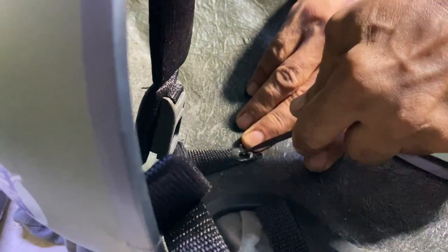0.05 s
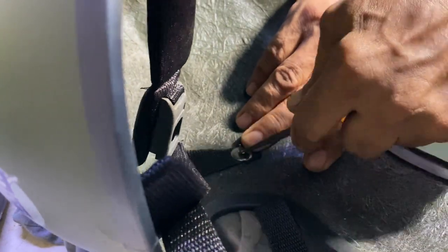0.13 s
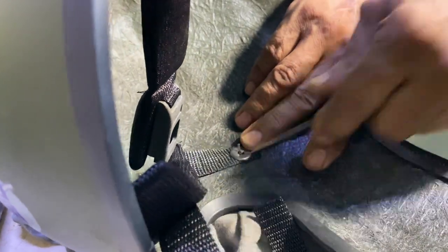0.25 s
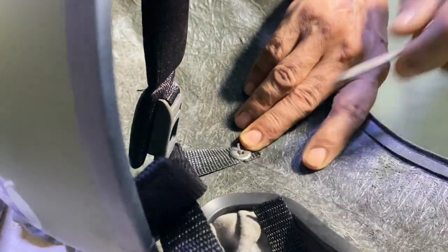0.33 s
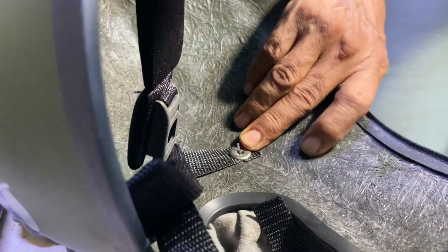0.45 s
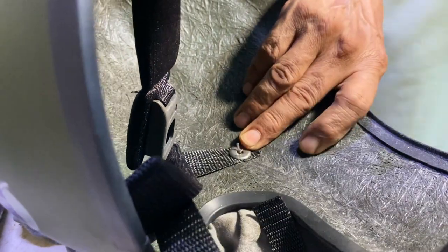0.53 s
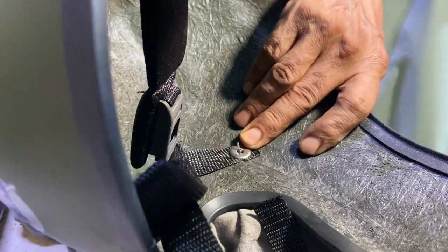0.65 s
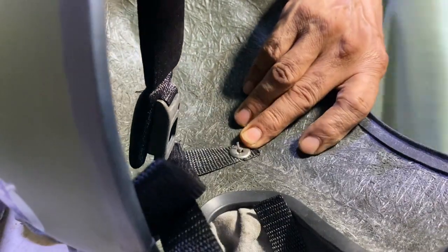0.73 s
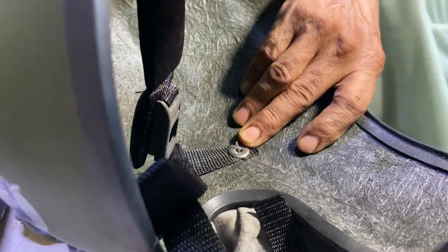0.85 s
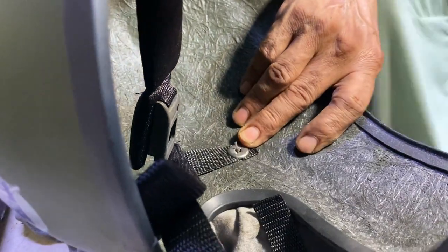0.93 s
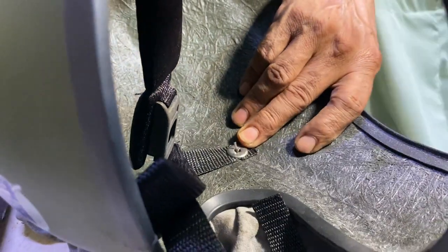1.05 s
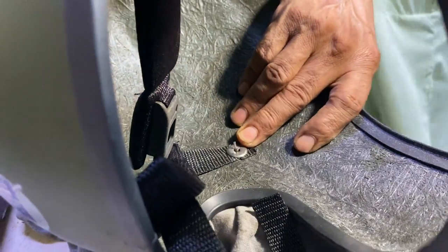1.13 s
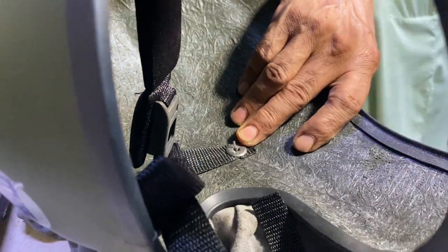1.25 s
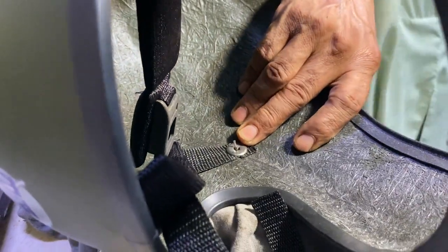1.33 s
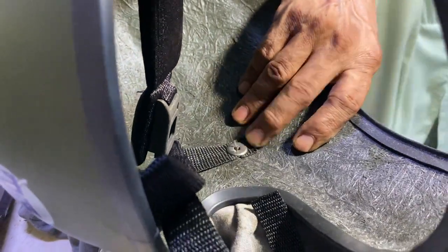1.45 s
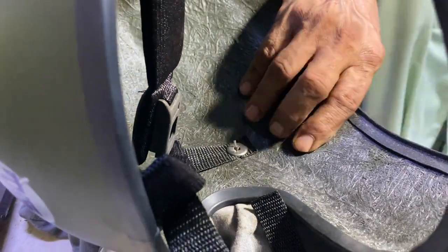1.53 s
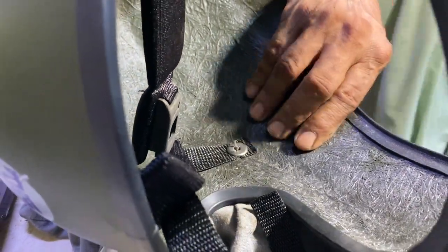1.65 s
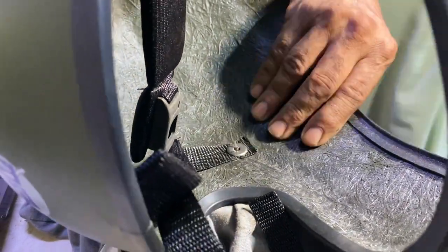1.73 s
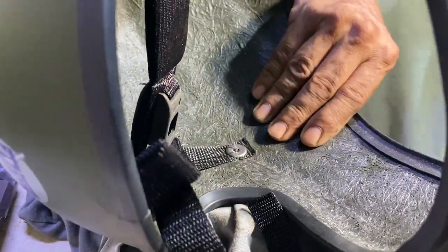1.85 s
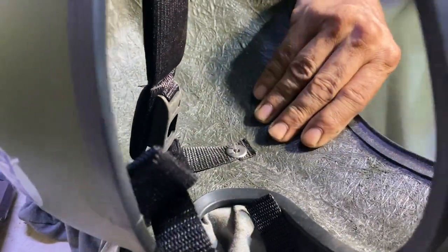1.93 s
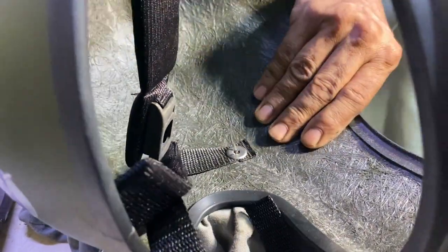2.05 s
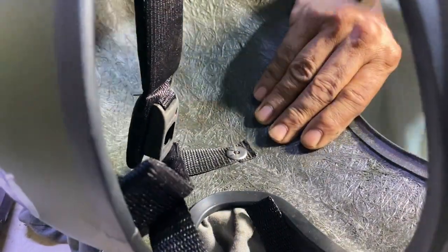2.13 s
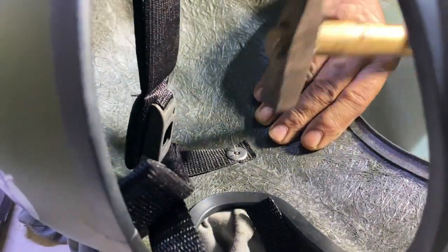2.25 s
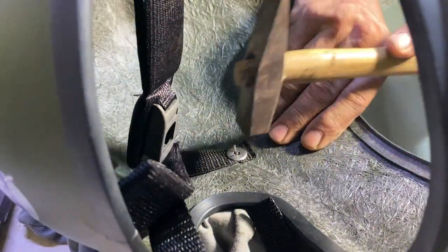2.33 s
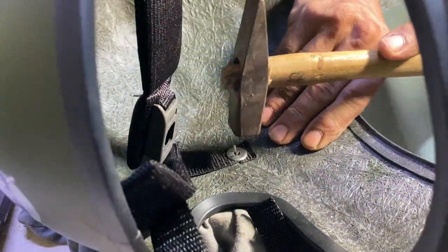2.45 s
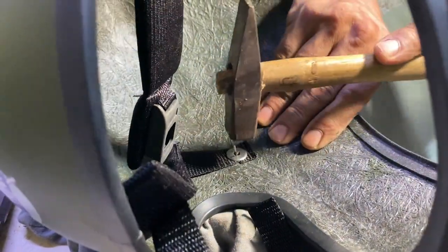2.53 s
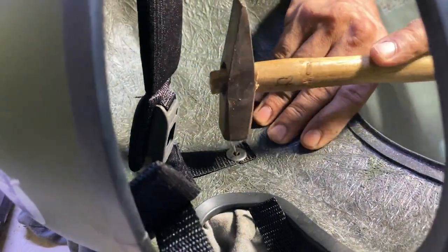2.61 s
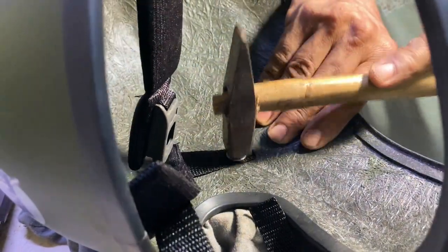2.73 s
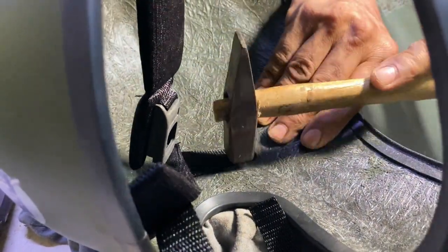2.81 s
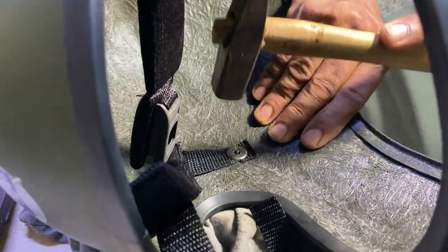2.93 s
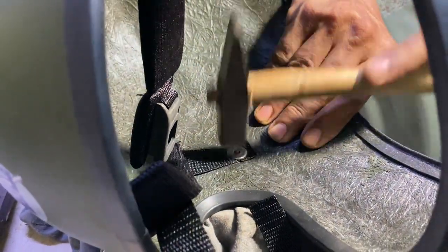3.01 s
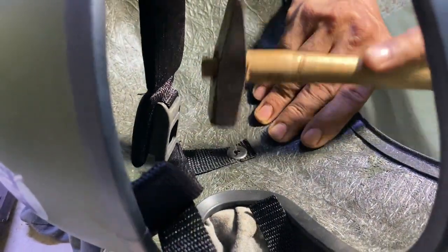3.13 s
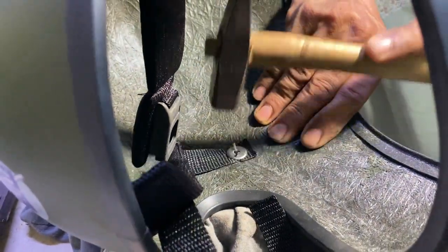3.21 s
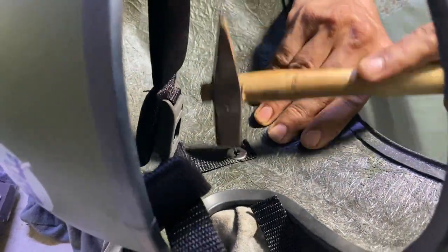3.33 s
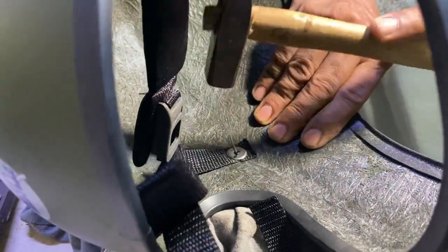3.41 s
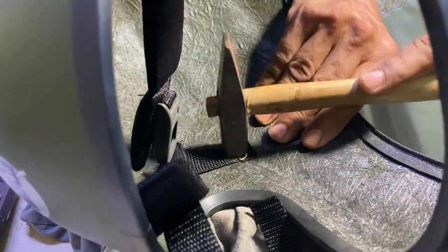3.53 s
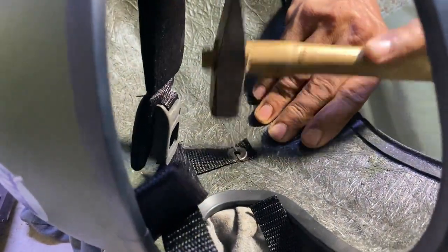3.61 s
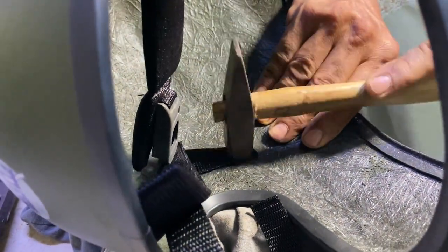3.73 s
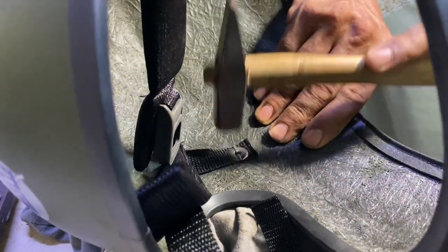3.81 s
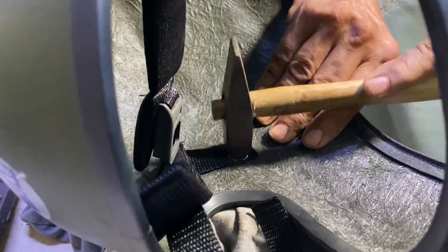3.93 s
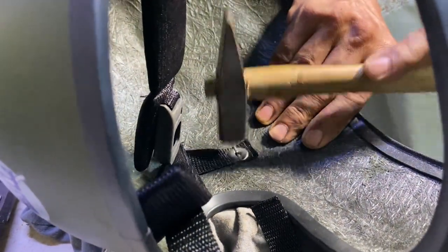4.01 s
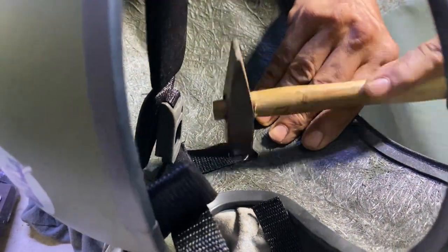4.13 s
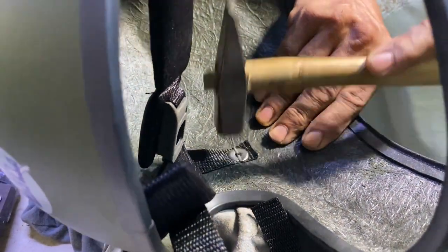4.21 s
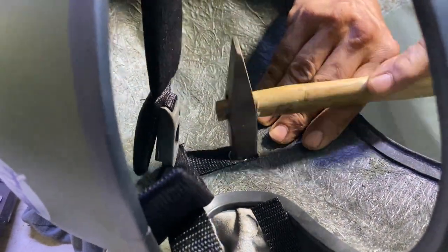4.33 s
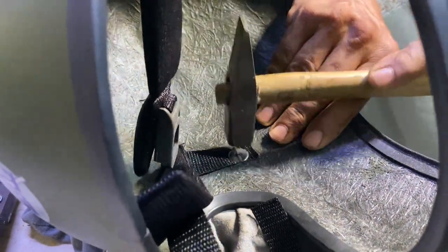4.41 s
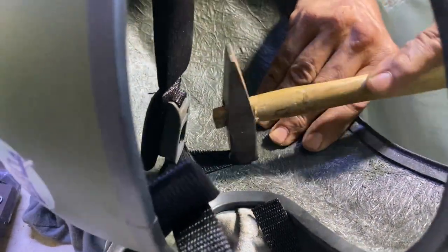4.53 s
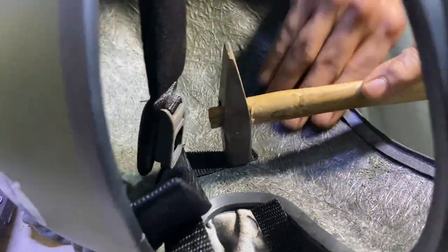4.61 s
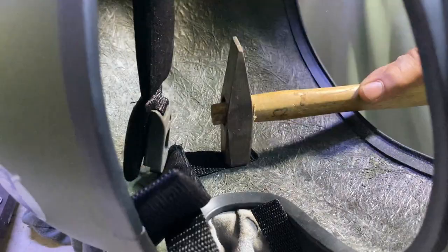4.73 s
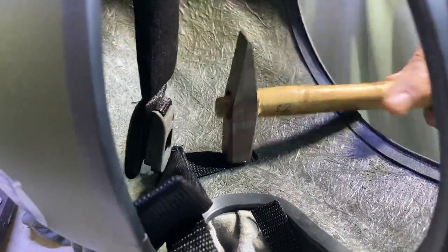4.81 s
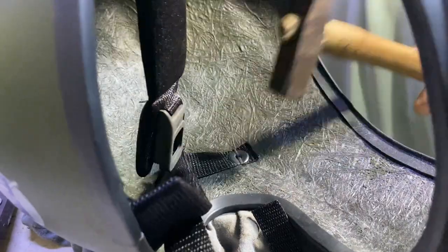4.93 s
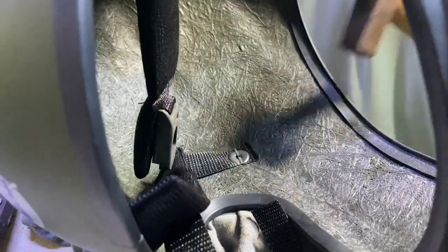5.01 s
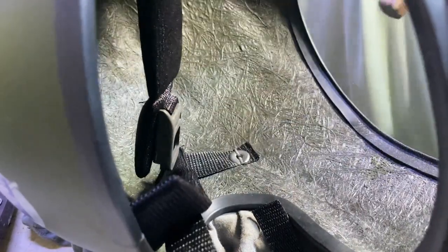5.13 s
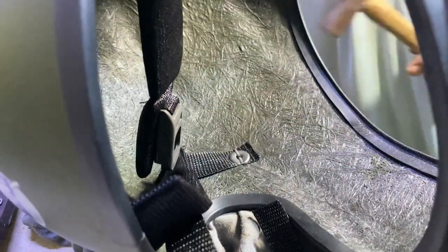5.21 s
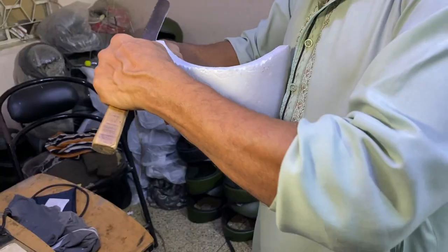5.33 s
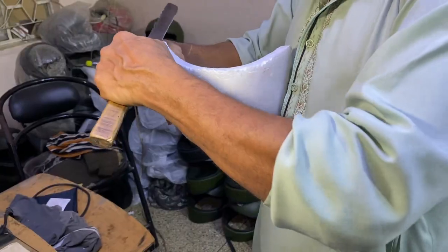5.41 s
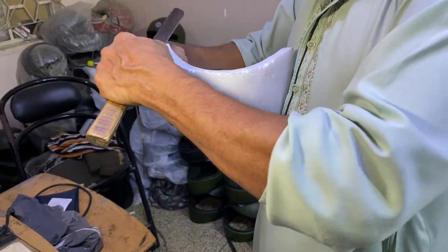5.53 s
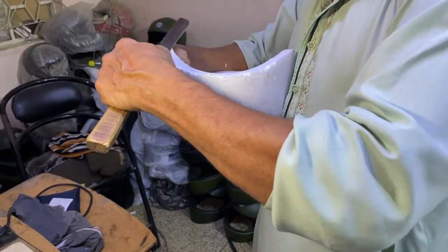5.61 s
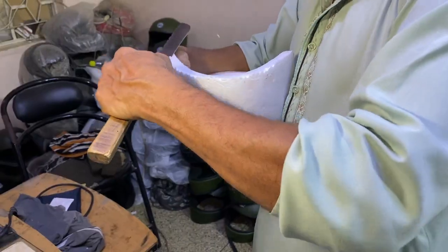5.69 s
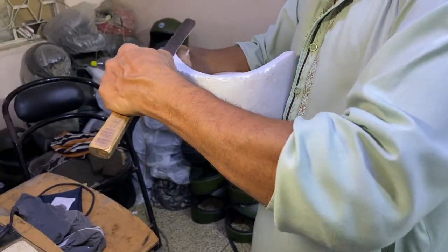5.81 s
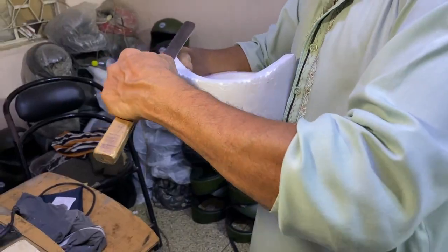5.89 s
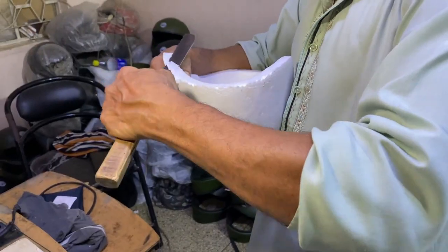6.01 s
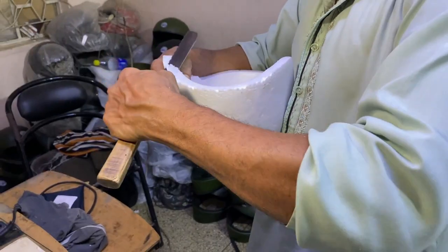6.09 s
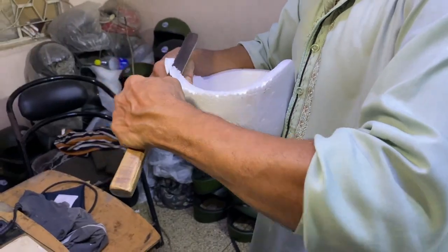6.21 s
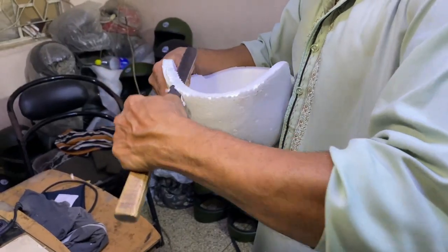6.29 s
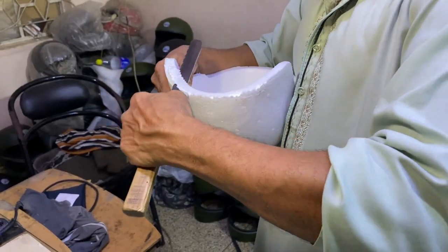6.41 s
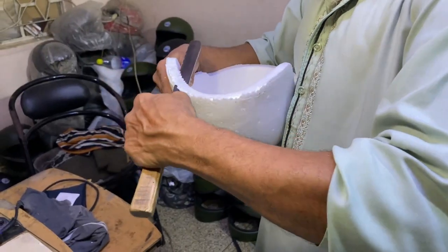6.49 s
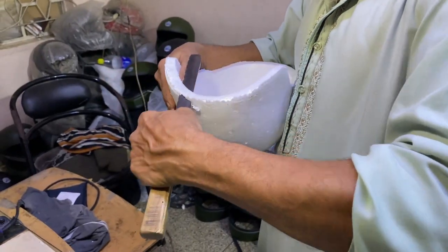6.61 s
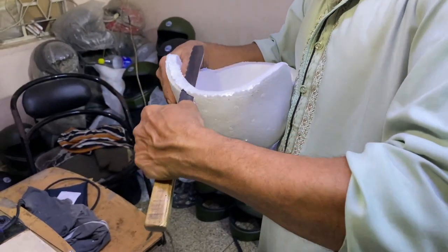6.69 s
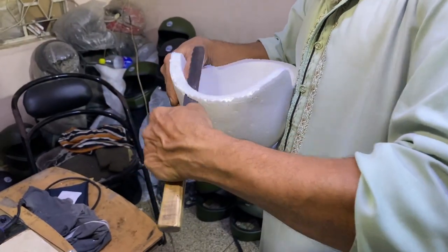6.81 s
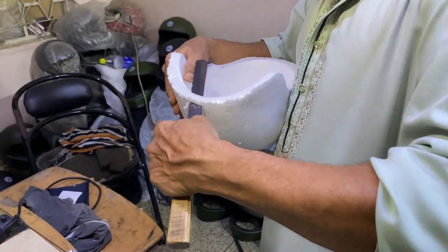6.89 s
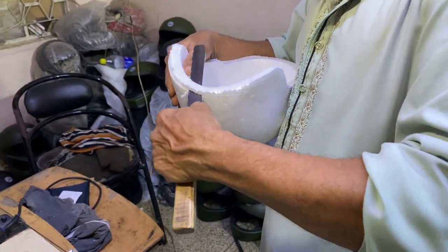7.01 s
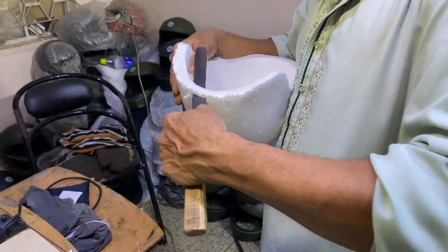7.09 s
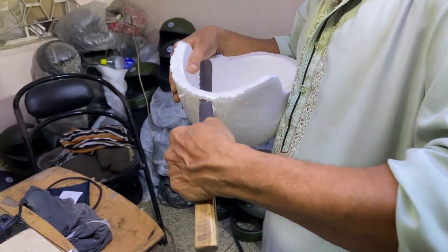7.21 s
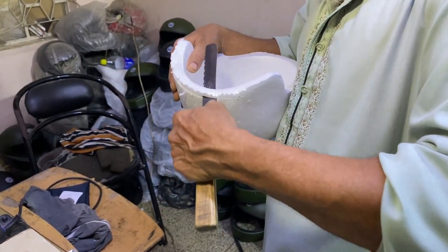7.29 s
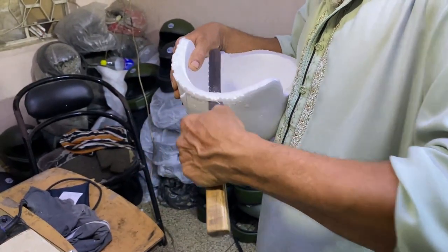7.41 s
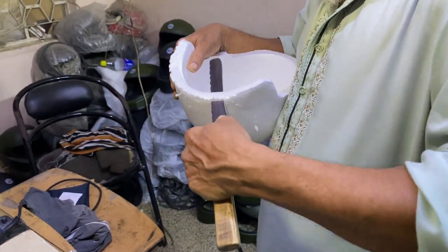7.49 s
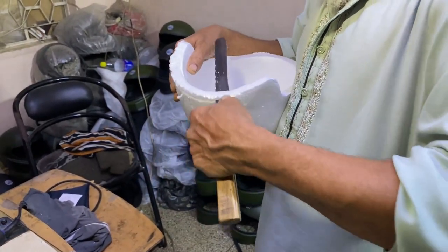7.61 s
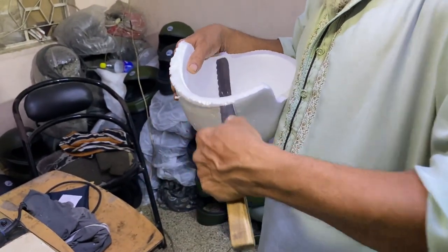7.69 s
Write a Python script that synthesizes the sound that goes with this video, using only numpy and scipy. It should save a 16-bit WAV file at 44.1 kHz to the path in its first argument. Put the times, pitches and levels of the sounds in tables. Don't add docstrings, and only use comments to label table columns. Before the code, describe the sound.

A tool clatters onto a bench, a hammer knocks a rivet into a hollow helmet shell, then a rasp scrapes foam in quick strokes amid wind thumps.

```python
import sys
import numpy as np
from scipy import signal
from scipy.fft import rfft, irfft
from scipy.io import wavfile

SR = 44100
rng = np.random.default_rng(int(sys.argv[2]) if len(sys.argv) > 2 else 0)


def dump(signal):
    limited = np.clip(np.atleast_2d(signal).T, -1, 1)
    pcm = np.round(limited * 32767).astype(np.int16)
    wavfile.write(sys.argv[1], SR, pcm)


def to_linear_factor(level_db):
    exponent = np.asarray(level_db, float) / 20
    return 10 ** exponent


N = 341775

# (pitch [Hz], left over right [dB])
LEFT_LIFT = [(100, 0.5), (500, 3), (1200, 12.5), (2200, 2.5), (4000, 20), (7000, 40)]

EDGES = 45 * 2 ** np.arange(0, 8.6, .5)
BANK = [signal.butter(2, [lo, hi], "band", fs=SR, output="sos") for lo, hi in zip(EDGES, EDGES[1:])]
CENTRES = np.sqrt(EDGES[:-1] * EDGES[1:])


def rms_one(x):
    return x / np.sqrt(np.mean(x ** 2) + 1e-20)


def in_time(rows):
    s, *columns = np.transpose(rows)
    return [np.interp(np.arange(N) / SR, s, c) for c in columns]


def at_hz(points, hz):
    pitch, value = np.array(points)[:, 0], np.array(points)[:, 1]
    return np.interp(np.log(hz), np.log(pitch), value)


def drift(rate, size):
    r = np.exp(-80 * np.pi * rate / SR)
    chance = rng.standard_normal(size // 40 + 1002)
    slow = signal.lfilter([1], [1, -2 * r, r * r], chance)[1000:]
    return np.interp(np.arange(size) / 40, np.arange(len(slow)), rms_one(slow))


def add(out, sound, s):
    i = round(s * SR)
    out[:, i:i + sound.shape[-1]] += sound[..., :N - i]


def coloured(x, spectrum):
    hz = np.maximum(np.fft.rfftfreq(x.shape[-1], 1 / SR), 1)
    return irfft(rfft(x) * to_linear_factor(at_hz(spectrum, hz)), x.shape[-1])


def bands(spectrum, white, shape):
    # (pitch [Hz], likeness [0 to 1])
    likeness = [(60, 0.92), (250, 1), (600, 0.3), (1200, 0.49), (1900, 0.2), (2500, 0.62), (4000, 0.52),
                (6500, 0.13)]
    out = 0
    for k, (sos, hz) in enumerate(zip(BANK, CENTRES)):
        mid, side = signal.sosfilt(sos, white[k % 2])
        alike = np.clip(at_hz(likeness, hz), -1, 1)
        stereo = np.sqrt(1 + alike) * mid + np.sqrt(1 - alike) * side * [[1], [-1]]
        out = out + to_linear_factor(at_hz(spectrum, hz)) * shape(hz) * stereo
    return out


def burst(spectrum, t60, size):
    t = np.arange(size) / SR
    white = rng.standard_normal((2, 2, size))
    noise = bands(spectrum, white, lambda hz: to_linear_factor(-60 * t / np.maximum(t60(hz), 1e-3)))
    return noise / np.sqrt(np.mean(noise[:, :150] ** 2))


def struck(modes, gains_db, travel, size):
    hz, level_db, t60 = np.transpose(modes)
    t = np.maximum(np.arange(size) / SR - (travel / np.sqrt(hz))[:, None], 0)
    luck = rng.standard_normal((4, len(hz)))
    pitch = hz * (1 + .03 * luck[3])
    rings = np.sin(2 * np.pi * pitch[:, None] * t) * to_linear_factor(-60 * t / t60[:, None])
    spot_db = 1.5 * luck[:3]
    side_db = at_hz(LEFT_LIFT, hz) / 2 * [[1], [-1]] + spot_db[1:]
    signs = (-1) ** np.arange(len(hz))
    return (to_linear_factor(level_db + gains_db + spot_db[0] + side_db) * signs) @ rings


def room_tone():
    # (pitch [Hz], level [dB per Hz])
    hum = [(35, -34), (60, 2.5), (92, -9.5), (284, -3.5), (328, 0.5), (437, -9), (484, -2.5), (645, -8.5),
           (971, -1), (1430, -10.5), (1720, -9.5), (2490, -15.5), (2930, -21), (8000, -40.5), (10400, -62),
           (17600, -120)]
    # (pitch [Hz], level [dB per Hz])
    hiss = [(1500, -19), (4000, -1.5), (7000, -4.5), (11000, -9), (16500, -11)]
    # (hum [dB], hiss [dB])
    places = [
        (-37, -67.5),
        (-36, -61),
    ]
    # (time [s], level change [dB])
    shade = [
        (0, 0.5),
        (3.4, 1.26),
        (3.8, -1.5),
        (4.4, -1.5),
        (4.65, -5),
        (4.95, -6.5),
        (5.32, -2.5),
    ]
    move_s = 5.325
    shade_db, = in_time(shade)
    moved = np.arange(N) >= move_s * SR
    hum_db = np.where(moved, places[1][0], places[0][0] + shade_db)
    hiss_db = np.where(moved, places[1][1], places[0][1] + 1.26 * shade_db)
    together = drift(9.3, N)
    white = rng.standard_normal((2, 2, N))
    flat = bands([(20, 0), (20000, 0)], white, lambda hz: to_linear_factor(.8 * together + 1.2 * drift(10, N)))
    low = to_linear_factor(hum_db + 1.5) * rms_one(coloured(flat, hum))
    high = to_linear_factor(hiss_db + 6.0) * rms_one(coloured(flat, hiss))
    return (low + high) * to_linear_factor([[.6], [-.6]])


def draught():
    # (time [s], level [dB], brightness [dB])
    flow = [(0.0, -34.5, -3), (0.3, -38.5, 4), (0.47, -33, -4), (1.64, -47.5, 3.5), (2.22, -33.5, -5.5),
            (2.59, -42, 8), (3.17, -28.5, -4), (3.39, -41.5, 6.5), (4.1, -45.5, 6.5), (4.64, -33.5, -3),
            (4.92, -27.5, -11), (5.18, -25.5, -11.5), (5.33, -32, -0.5), (5.83, -31.5, 0.5),
            (6.06, -39, -7), (6.86, -32, -2.5), (7.38, -35.5, 5), (7.75, -29.5, -8)]
    # (time [s], peak [dB], pitch [Hz])
    gusts = [(0.436, -14.5, 174), (0.488, -21, 362), (0.525, -13.5, 149), (0.601, -18.5, 86.1),
             (1.677, -28.5, 76), (2.004, -14.5, 210), (2.123, -24, 81), (2.678, -29.5, 68.6),
             (3.22, -24, 150), (0.299, -19.5, 91), (0.779, -23, 90), (4.81, -22, 103.5),
             (5.037, -18.5, 113), (5.297, -19.5, 61.5), (5.671, -30.5, 83.4), (5.88, -21, 207),
             (5.925, -9.5, 122.5), (6.227, -14.5, 150), (6.319, -18, 112), (6.651, -17.5, 205),
             (6.678, -18, 240), (6.828, -15, 147), (6.899, -17.5, 194), (6.998, -19.5, 126),
             (7.111, -11.5, 70.0), (7.127, -19, 83), (7.209, -22, 83.4), (7.28, -16, 147),
             (7.466, -17, 192)]
    # (multiple of its pitch [times], level [dB per Hz])
    puff = [(.5, 3.5), (1.2, -1.5), (2.6, -8.5), (4.5, -26.5), (12.5, -66)]
    swell_db, swell_rise_s, swell_s = -14.5, 0.0055, 0.029
    level_db, bright_db = in_time(flow)

    clock = np.arange(0, N, 40) / SR
    swells = 0
    for s, db, hz in gusts:
        rise_and_fall = np.minimum((clock - s) / swell_rise_s, (s - clock) / swell_s)
        swells = swells + to_linear_factor(db + swell_db) * np.exp(rise_and_fall)
    lumps_db = 5 * np.tanh(drift(5.8, N))
    level_db = 20 * np.log10(to_linear_factor(level_db + lumps_db) + np.repeat(swells, 40)[:N])

    common, own = rng.standard_normal((2, N)), rng.standard_normal((2, 2, N))
    low_band = signal.butter(2, [50, 150], "band", fs=SR, output="sos")
    high_band = signal.butter(2, [150, 400], "band", fs=SR, output="sos")
    low = signal.sosfilt(low_band, common[0] + 0.27 * own[0])
    high = signal.sosfilt(high_band, common[1] + 0.53 * own[1])
    high_gain = to_linear_factor(bright_db - 3 + 2.7 * np.tanh(drift(36, N)))
    flutter_db = 4.46 * np.tanh(drift(25, N))
    out = to_linear_factor(level_db - 3.0 + flutter_db) * (rms_one(low) + high_gain * rms_one(high))

    t = np.arange(4000) / SR
    for s, db, hz in gusts:
        push = burst(np.multiply(puff, [hz, 1]), lambda hz: 0.075, size=3000)
        add(out, to_linear_factor(db - 14) * push, s + .006)
        cycles = hz * (t + 0.54 * 0.012 * (1 - np.exp(-t / 0.0081)))
        thump = np.sin(2 * np.pi * cycles) + 0.37 * np.sin(4.6 * np.pi * cycles) * np.exp(-t / 0.0055)
        fade = (1 - np.exp(-t / 0.0045)) * np.exp(-t / 0.016)
        add(out, to_linear_factor(db - 5.0) * thump * fade, s + 0.00794)
    return out


def clatter():
    # (time [s], peak [dB], hollow knock against it [dB], rattle's 60 dB fade [s])
    hits = [
        (1.1217, -11, -1, 0.078),
        (1.1411, -11.5, 4, 0.12),
        (1.1541, -16, -11, 0.025),
        (1.1591, -9, -15, 0.06),
        (1.1687, -3, -34, 0.023),
        (1.1767, -12.5, -7, 0.11),
        (1.2076, -24, -20, 0.072),
        (1.237, -20.5, -9.5, 0.2),
    ]
    # (pitch [Hz], level [dB], 60 dB fade [s])
    bench = [(252, -11, 0.12), (563, -5, 0.073), (693, 2.5, 0.04), (892, -1.5, 0.038), (1113, -9.5, 0.047),
             (1467, -11.5, 0.046), (2023, 1, .04), (2420, -30, .03)]
    # (pitch [Hz], level [dB per Hz])
    rattle = [(300, -32), (700, -9), (2000, 3), (4000, -2), (8000, -7), (12000, -20), (16500, -3)]
    # (time [s], peak [dB], 60 dB fade [s], body against it [dB])
    ticks = [
        (0.2977, -25, 0.036, 5),
        (0.305, -24, 0.029, 8),
        (4.6643, -41, 0.03, -2),
        (4.6787, -40, 0.028, 6),
        (5.3338, -35, 0.034, -9),
        (5.499, -38, 0.026, -10),
        (5.5774, -47, 0.03, 4),
        (6.316, -18, 0.048, -22),
    ]
    out = np.zeros((2, N))
    for s, db, knock_db, t60 in hits:
        knock = struck(bench, knock_db - 3, travel=0.017, size=5000)
        bright = to_linear_factor(-7.0) * burst(rattle, lambda hz: t60, size=5000)
        add(out, to_linear_factor(db) * (knock + bright), s)
    for s, db, t60, body_db in ticks:
        colour = [(600, body_db + 7), (3000, body_db), (7000, -3), (16500, -7.5)]
        add(out, to_linear_factor(db - 8.0) * burst(colour, lambda hz: t60, size=3000), s)
    return out


def rasp():
    # (start [s], level [dB], part spent speeding up [0 to 1])
    strokes = [(5.575, -45, 0.6), (5.80, -48, 0.13), (5.961, -38.5, 0.46), (6.11, -39.5, 0.32),
               (6.25, -36, 0.53), (6.404, -36, 0.35), (6.545, -38.5, 0.42), (6.714, -35, 0.35),
               (6.842, -35, 0.38), (7.029, -38, 0.17), (7.15, -35, 0.5), (7.288, -34.5, 0.55),
               (7.428, -34.5, 0.5), (7.574, -33, 0.41), (7.682, -36, 0.25)]
    # (pitch [Hz], level [dB per Hz])
    foam = [(500, 4), (1200, 2.5), (2500, -1), (5000, -3.5), (8000, 2.5), (12000, -10.5), (16500, 12)]
    # (pitch [Hz], width [Hz], level [dB])
    liner = [(1300, 200, 0), (2000, 200, -2), (2500, 220, 0), (3200, 250, -1), (4100, 300, -1),
             (4800, 300, -2), (5600, 350, -2)]
    last_turn_s = 7.81
    bite, speed_power = 0.91, 2.1
    turn_db = -13
    body_gain_db, body_follows, body_lag_s = 1.5, .85, .01

    start = round(strokes[0][0] * SR)
    size = N - start
    t = (start + np.arange(size)) / SR
    turns, peak_db, rise = np.transpose(strokes)
    ends = np.append(turns[1:], last_turn_s)
    fastest = turns + np.clip(rise, .1, .9) * (ends - turns)
    moments = np.append(np.ravel([turns, fastest], order="F"), ends[-1])
    swing = np.interp(t, moments, np.arange(2 * len(turns) + 1) / 2)
    speed = np.abs(np.sin(np.pi * swing)) ** speed_power
    speed_db = 20 * np.log10(np.tanh(bite * speed) / np.tanh(bite) + to_linear_factor(turn_db))
    level_db = np.interp(t, fastest, peak_db) + speed_db
    late_db = np.interp(t - body_lag_s, t, speed_db)
    body_db = body_gain_db + body_follows * late_db - speed_db

    uneven_db = 1.48 * rng.exponential(1, size) + 2.0 * drift(270, size)
    grains = rng.standard_normal((2, 2, size)) * to_linear_factor(uneven_db)

    def band_gain(hz):
        body = np.clip(np.log2(9000 / hz), 0, 1)
        return to_linear_factor(body * (body_db - 1) + (1.2 + 1.3 * body) * drift(12, size))

    tearing = bands(foam, rms_one(grains), band_gain)
    for hz, width_hz, db in liner:
        r = np.exp(-np.pi * width_hz / SR)
        feedback = [1, -2 * r * np.cos(2 * np.pi * hz / SR), r * r]
        ringing = signal.lfilter([1, 0, -1], feedback, grains[0, 0] + grains[1])
        grip_db = 9.7 * np.tanh(drift(6.9, size))
        tearing += to_linear_factor(db + body_db - 20.0 + grip_db) * rms_one(ringing)
    out = np.zeros((2, N))
    out[:, start:] = to_linear_factor(level_db + 6.5) * tearing * np.minimum(np.arange(size) / 2000, 1)
    return out


def sweep(colour, travel, size):
    # (pitch [Hz], level [dB per Hz])
    pulse = [(30, -14.5), (110, 14), (250, 2), (450, -1.5), (800, 18.5), (1300, -2), (2200, -9.5),
             (4500, -16), (7000, -40.5)]
    hz = np.maximum(np.fft.rfftfreq(size, 1 / SR), 1)
    side_db = at_hz(LEFT_LIFT, hz) / 2 * [[1], [-1]]
    gain = to_linear_factor(at_hz(pulse, hz) + at_hz(colour, hz) + side_db)
    turn = np.exp(-4j * np.pi * travel * np.sqrt(hz) - 1j * rng.uniform(-.6, .6))
    return SR / 2600 * irfft(gain * turn, size)


def hammer():
    # (time [s], knock peak [dB], then against it: boom [dB], shell body [dB], steel crack [dB])
    blows = [(2.805, -17, -13, 1.5, -7), (2.8369, -25.5, -16, 0, -19), (3.087, -12, -24.5, -4, -3),
             (3.3122, -17, -34, -6, -13), (3.3165, -15, -23, 6.5, -2), (3.3278, -24.5, -12, -15, -5),
             (3.5471, -11, -11, 2, -7.5), (3.7659, -17, -13, 10, -9.5), (3.7929, -39, -6.5, 15, -5),
             (3.9734, -11.5, -19.5, 1.5, -9.5), (4.1695, -9, -19.5, -2, -9), (4.352, -12.5, -22, 4, -25.5),
             (4.3738, -18, -24.5, 2.5, -13), (4.5045, -15.5, -28, 5, -17.5), (4.518, -29, -7, 5.5, -22.5)]
    # (pitch [Hz], level [dB], 60 dB fade [s])
    shell = [(48.7, 1.5, 0.11), (76, -1, 0.23), (108, 10.5, 0.081), (165.4, 9.5, 0.075), (210, 7, 0.21),
             (319, 11.5, 0.055), (366.5, 6, 0.14), (622, 9.5, 0.035), (700, 17.5, 0.015), (946, 6.5, 0.077),
             (1154, -3.5, 0.098), (1533, 9.5, 0.035), (1980, 4.5, 0.029), (2396, 6, 0.018),
             (2830, -28, 0.0138), (3460, -1.5, 0.029)]
    # (pitch [Hz], level [dB], 60 dB fade [s])
    steel = [(5500, -27, 0.015), (7000, 10, 0.0018), (8250, 0, 0.006), (9900, -7, 0.017),
             (12170, 4.5, 0.0031), (14700, -13.5, 0.0103)]
    # (pitch [Hz], level [dB per Hz])
    crack = [(800, 24.5), (3000, -17), (8000, 3.5), (16500, -22)]
    # (pitch [Hz], level [dB per Hz])
    scatter = [(150, -12), (400, 5), (900, 3), (2000, -0.5), (4500, -12.5), (9000, -16.5), (16500, -63)]
    size = 6000
    out, hz = np.zeros((2, N)), np.array(shell)[:, 0]
    build = np.minimum(np.arange(size) / 130, 1)
    fade = np.clip(np.linspace(3, -.3, size), 0, 1)
    for s, db, boom_db, body_db, crack_db in blows:
        thud_db = -14.0 - (1 - 0.32) * db
        colour = [(90, boom_db + 19), (160, thud_db + 7.0), (400, thud_db + 3.5),
                  (600, body_db), (1300, body_db), (1900, 5.2)]
        blow = sweep(colour, travel=.085, size=size)
        blow += struck(shell, at_hz(colour, hz) - 18, travel=0.0978, size=size)
        blow += struck(steel, crack_db - 14, travel=0.0096, size=size)
        blow += to_linear_factor(crack_db + 7.0) * burst(crack, lambda hz: .008, size=size)
        blow += to_linear_factor(crack_db - 12.0) * burst(crack, lambda hz: .07, size=size)
        rattle = burst(scatter, lambda hz: 0.13 * (hz / 1000) ** -.2, size=size)
        blow += to_linear_factor(-14.0) * coloured(rattle, colour) * build
        add(out, to_linear_factor(db) * blow * fade, s)
    return out


def workshop(x):
    # (pitch [Hz], 60 dB fade [s])
    room_t60 = [(200, 0.6), (1000, 0.37), (4000, 0.51), (16000, 0.34)]
    tail = burst([(100, 1.5), (1000, 1.5), (16000, -6.0)], lambda hz: at_hz(room_t60, hz), size=22000)
    tail = tail / np.sqrt(np.sum(tail[0] ** 2))
    return signal.fftconvolve(np.mean(x, axis=0, keepdims=True), tail, axes=1)[:, :N]


def scene():
    near, far, filing = hammer(), clatter(), rasp()
    echo = workshop(to_linear_factor(-16.5) * near + to_linear_factor(-8) * far + to_linear_factor(-13) * filing)
    return near + far + filing + echo + draught() + room_tone()


def roll_off(x):
    return signal.sosfilt(signal.butter(12, 17100, fs=SR, output="sos"), x)


def record(dry):
    # (pitch [Hz], phase [rad])
    port_phase = [(60, -0.12), (300, -0.47), (1200, -0.61), (1700, -1.98), (2400, -1.25), (4100, -1.03),
                  (6700, 1)]
    # (pitch [Hz], level [dB])
    mic = [(20, -22.5), (45, 2.5), (60, 1), (6000, -1.5), (7200, -3), (9000, 1.5), (11000, 0), (13300, 1),
           (15700, 0), (16100, -29.5), (17500, -43)]
    treble_hz, treble_turn_hz = 6830, 4300
    hz = np.maximum(np.fft.rfftfreq(N, 1 / SR), 1)
    left, right = rfft(dry)
    shared = .995 * np.clip((hz - treble_hz + 900) / 1400, 0, 1)
    early = left * np.exp(2j * np.pi * (hz - treble_hz) / treble_turn_hz)
    own = right * np.exp(1j * at_hz(port_phase, hz))
    right = np.sqrt(1 - shared) * own + np.sqrt(shared) * early
    loud = coloured(irfft(np.array([left, right]), N), mic)
    return roll_off(1.074 * np.tanh(loud / 1.127))


dry = scene()
out = record(dry)
dump(out)
```